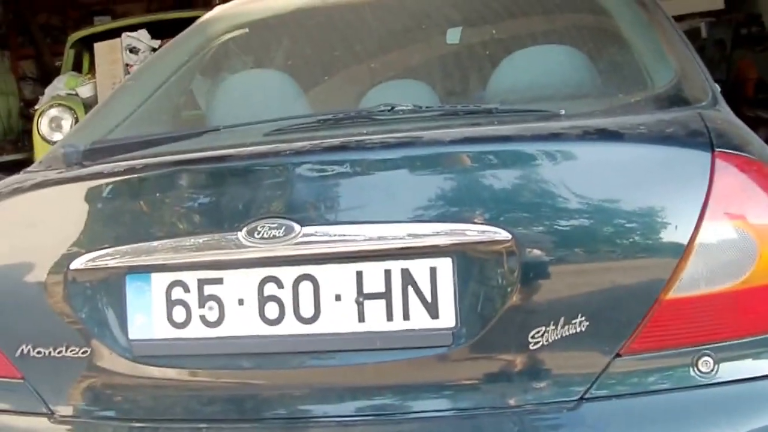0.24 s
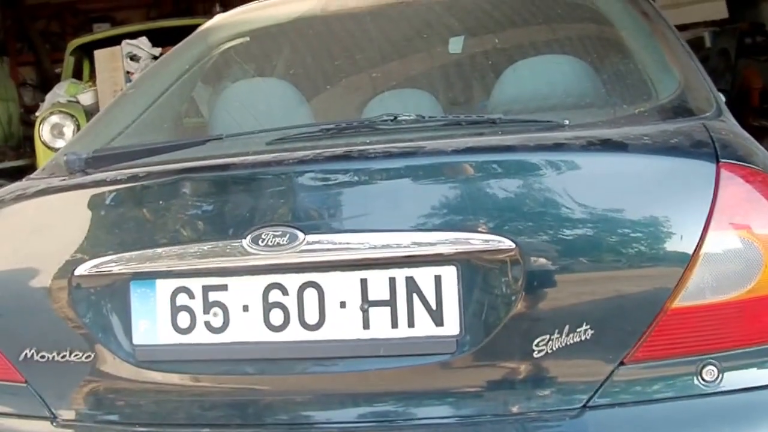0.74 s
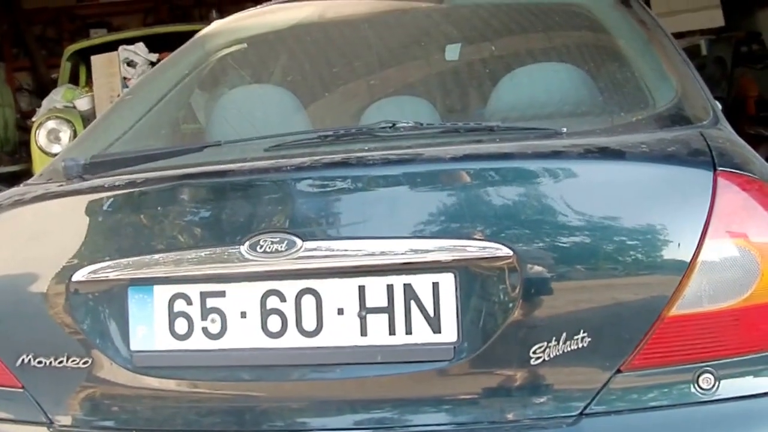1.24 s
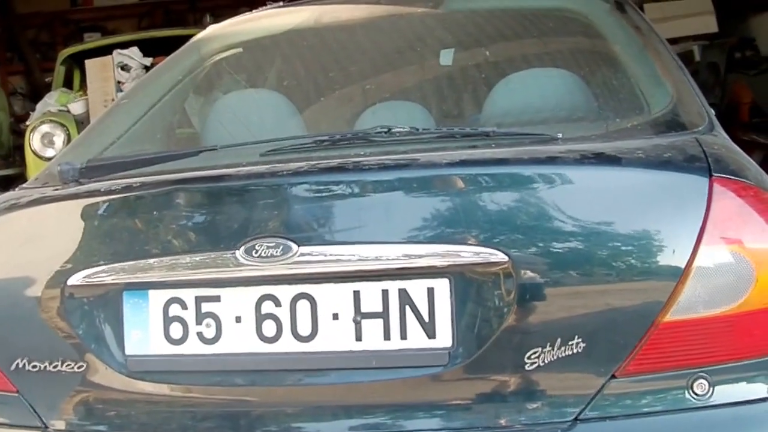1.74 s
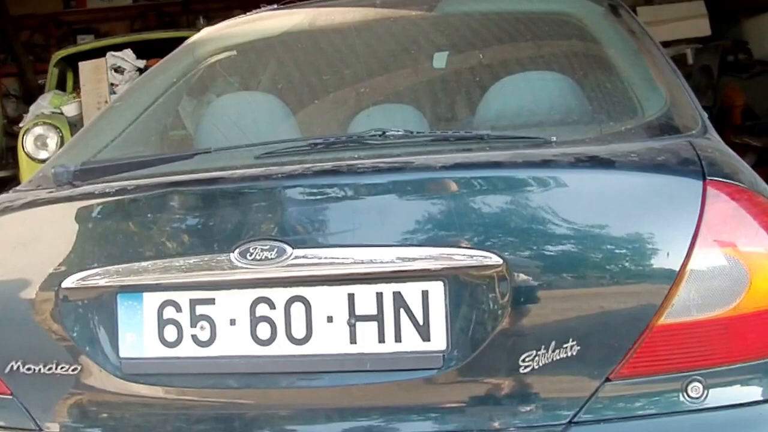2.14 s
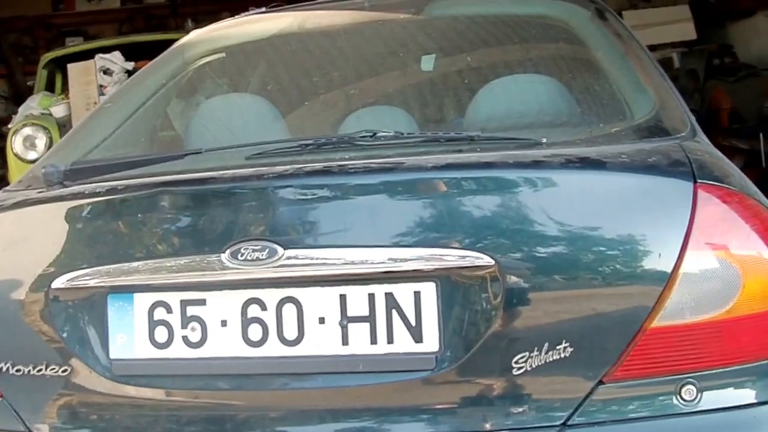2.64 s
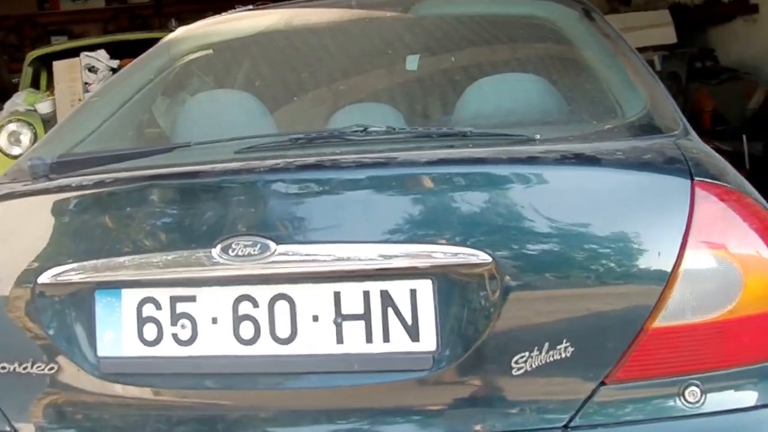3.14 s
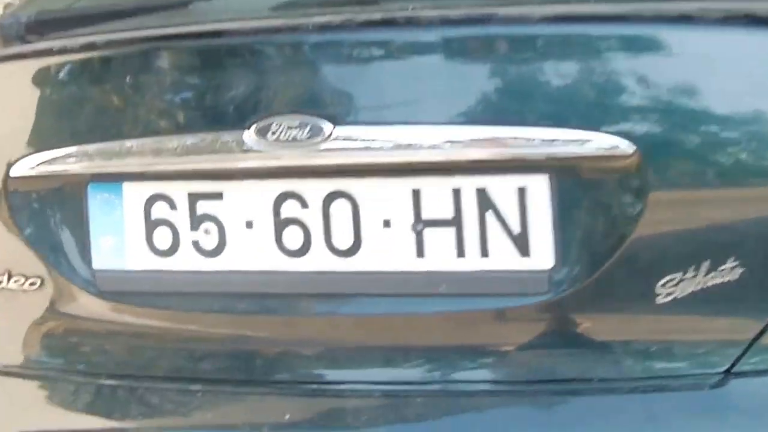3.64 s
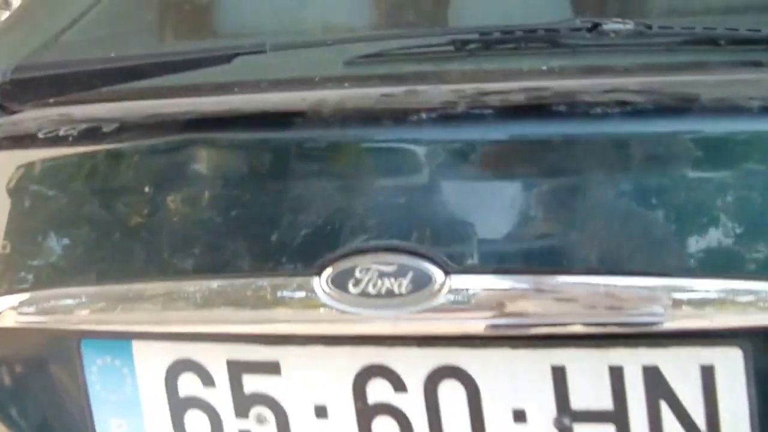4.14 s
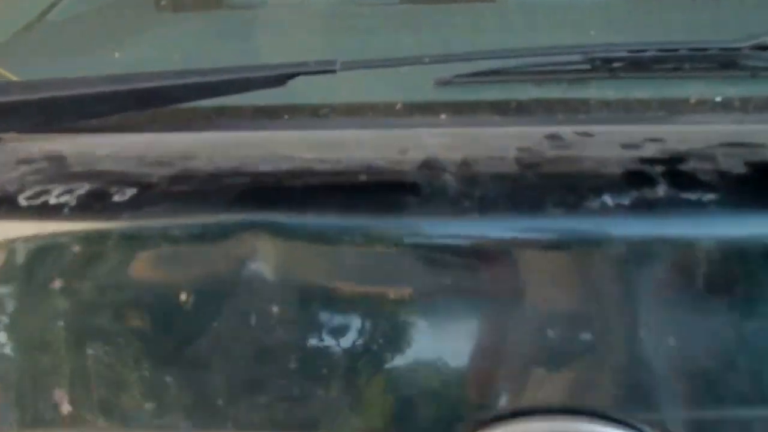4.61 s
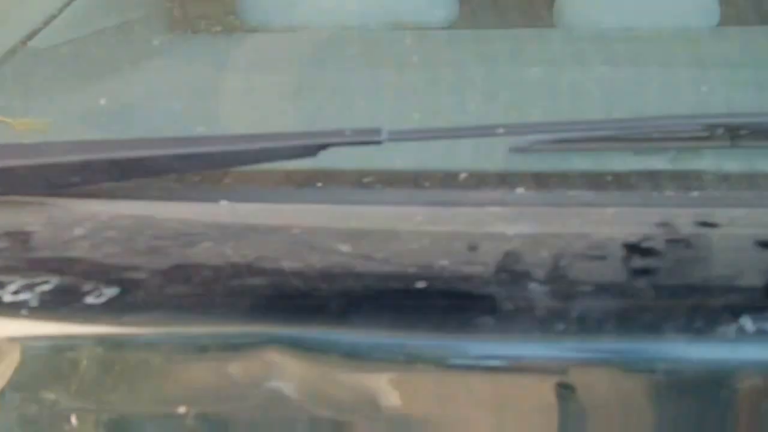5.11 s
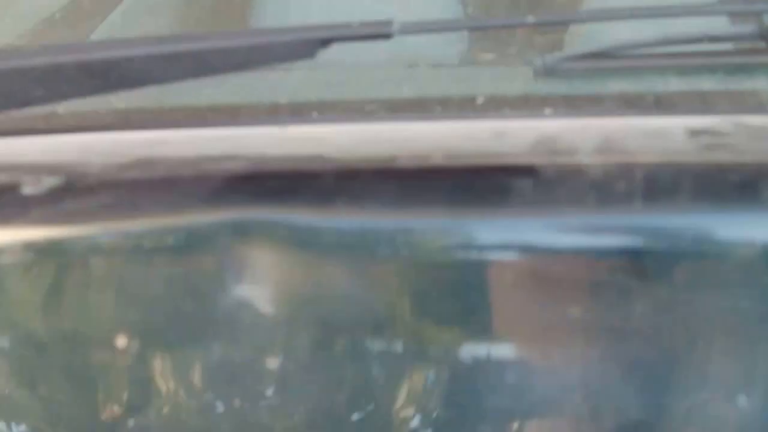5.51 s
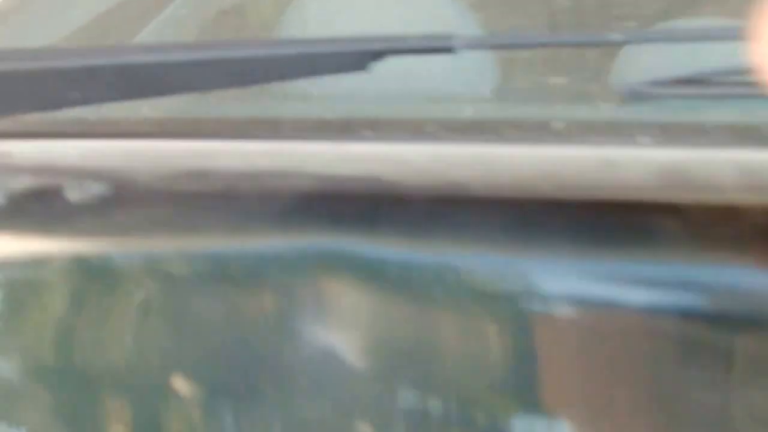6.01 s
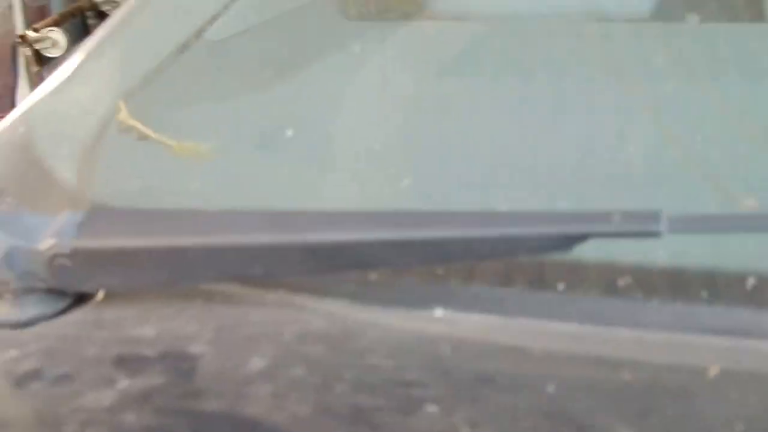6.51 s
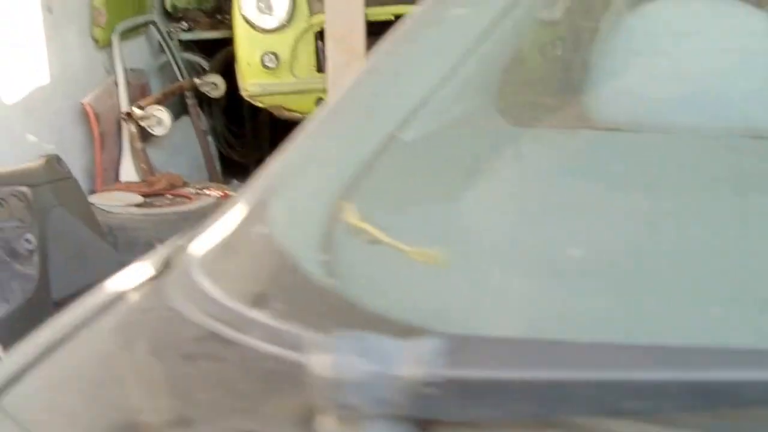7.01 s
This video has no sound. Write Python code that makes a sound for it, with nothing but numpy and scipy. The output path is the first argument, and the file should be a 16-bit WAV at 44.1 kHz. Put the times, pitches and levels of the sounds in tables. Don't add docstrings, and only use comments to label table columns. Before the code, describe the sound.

Quiet outdoor air, light hiss and a thin buzzing camera whine run throughout. A small plastic button clicks at 0.15 seconds, followed by soft, dull thuds around 0.5. A distant bird gives short, rough falling chirps at 1.2 and again at 2.0; the button clicks at 1.9. At 2.63 the door locks whirr briefly and clunk hard, ringing panels and rods for a fraction of a second. A faint click and dry scrape come near 3.15. From 3.5 to 5.3, grit ticks, cloth and hand rubs, shoe scuffs and dull knocks cluster unevenly, with pebbles clicking at 4.03 to 4.11. Another button click at 5.29 leads to a stuttering rubber creak from 5.36 to 5.53, then small knocks and ticks. At 6.34 the hatch latch releases in a loud, close metallic clatter lasting about 0.12 seconds, with a low hum lingering. Soft shuffles and muted knocks finish by 7.3.

```python
import sys
import numpy as np
from scipy import signal
from scipy.fft import rfft, irfft, next_fast_len
from scipy.io import wavfile
from scipy.ndimage import uniform_filter1d

SR = 44100
rng = np.random.default_rng(int(sys.argv[2]) if len(sys.argv) > 2 else 0)


def output_pcm(signal):
    pcm = np.clip(np.atleast_2d(signal).T, -1, 1) * 32767
    wavfile.write(sys.argv[1], SR, np.round(pcm).astype(np.int16))


def rack_gain(trim_db):
    fader = np.asarray(trim_db, float)
    return 10 ** (fader / 20)


N = 320033

# freq_hz, level_db, t60_s
DOOR_MODES = [(639, -14, 0.42), (856, -19, 0.32), (1003, -14, 0.47), (1088, -3, 0.16), (1150, -8, 0.32),
              (1181, 1, 0.26), (1272, -16, 0.27), (1319, -6, 0.24), (1440, 4.5, 0.17), (1550, -3, 0.15),
              (1760, -2, 0.19), (2140, -7, 0.1), (2270, -8, 0.19), (2300, -5, 0.11)]
# freq_hz, level_db, t60_s
ROD_MODES = [(3170, -2, 0.23), (3302, 0.5, 0.3), (3400, -8, .25), (4070, 0, 0.2), (4430, -8, 0.39),
             (4530, -9, 0.4), (5281, -9, 0.29), (5450, -11, 0.18), (6196, -19, 0.24), (6756, -17, 0.3),
             (7350, -9, 0.26), (7693, -15, 0.24), (9878, -23, 0.26), (10170, -23, 0.26)]


def level(x, db):
    return x * rack_gain(db) / np.sqrt(np.mean(x ** 2))


def colour(x, points):
    hz, db = np.transpose(points)
    size = next_fast_len(len(x))
    log_hz = np.log(np.maximum(np.arange(size // 2 + 1) * SR / size, 1))
    gain = rack_gain(np.interp(log_hz, np.log(hz), db))
    return irfft(rfft(x, size) * gain, size)[:len(x)]


def band(x, hz, width_hz):
    b, a = signal.iirpeak(min(hz, 0.45 * SR), hz / width_hz, fs=SR)
    return signal.lfilter(b, a, x)


def peaks(x, table):
    out = np.zeros(len(x))
    for k, (hz, width_hz, db) in enumerate(table):
        pole_width_hz = 2.11 * width_hz
        steep = band(band(x, hz, pole_width_hz), hz, pole_width_hz)
        out += (-1) ** k * rack_gain(db) * steep
    return out


def grit(rate_hz, scatter_db):
    hit = rng.random(N) < rate_hz / SR
    size = rack_gain(scatter_db * np.minimum(rng.exponential(size=N), 3))
    return level(hit * size * rng.standard_normal(N), 0)


def ring(hz, ms):
    t = np.arange(int(0.06 * SR)) / SR
    attack = 1 - np.exp(-t * hz * 2.02)
    return np.sin(2 * np.pi * hz * t) * np.exp(-t * 2300 / ms) * attack


def add(out, s, sound):
    i = int(s * SR)
    out[i:i + len(sound)] += sound[:N - i]


def clunk(blows, shake, modes, modes_db, linger):
    out, start_s = np.zeros(N), blows[0][0] - 0.05
    shake = level(shake, 0)[int(start_s * SR):][:SR]
    t = start_s + np.arange(len(shake)) / SR
    dull = signal.sosfiltfilt(signal.butter(2, 2700, fs=SR, output="sos"), shake)
    treble = shake - dull
    rattle = np.zeros(len(shake))
    for s, db, rise_ms, fall_ms, treble_db in blows:
        age_ms = 1000 * np.maximum(t - s, 0)
        decay_db = np.maximum(-60 * age_ms / fall_ms, -200)
        force = rack_gain(db) * (1 - np.exp(-age_ms / rise_ms)) * rack_gain(decay_db)
        rattle += force * (dull + rack_gain(treble_db) * treble)
    twins = 1 + 0.0086 * rng.standard_normal((len(modes), 4))
    panels = np.zeros(len(shake))
    for (hz, db, t60_s), row in zip(modes, twins):
        width_hz = 2.2 / (linger * min(t60_s, 0.5))
        for twin in row:
            panels += rack_gain(db) * np.sqrt(t60_s) * band(rattle, hz * twin, width_hz)
    match = np.sqrt(np.sum(rattle ** 2) / np.sum(panels ** 2))
    add(out, start_s, rattle + panels * rack_gain(modes_db) * match)
    return out


def lock_actuators():
    # start_s, rattle_db, rise_ms, fall_t60_ms, treble_db
    blows = [
        (2.628, -35, 1.2, 160, -28),
        (2.643, -21.5, 4.9, 100, -41),
        (2.6465, -17, 0.9, 44, 3),
        (2.660, -25.5, 2.9, 169, -9.5),
        (2.69, -37, 12, 466, -11.5),
    ]
    # freq_hz, width_hz, level_db
    rattle_bands = [(232, 150, -24), (604, 236, -9.5), (1144, 710, -2.5), (1427, 680, -2.5), (2260, 260, -10),
                    (2770, 300, -35), (9940, 1450, -20), (14300, 2600, -29),
                    (3250, 200, -5.5), (4280, 410, -6), (5420, 310, -5.5), (7050, 660, -7)]
    shake = peaks(grit(20000, 0.96), rattle_bands)
    return clunk(blows, shake, [*DOOR_MODES, *ROD_MODES], -9.5, 0.36)


def struck_doors():
    out, t = np.zeros(N), np.arange(SR // 2) / SR
    strike_s, twin_spread = 2.649, 0.0056
    for table, db in ((DOOR_MODES, -35), (ROD_MODES, -41)):
        chance = rng.standard_normal((len(table), 2))
        for (hz, mode_db, t60_s), (off, turn) in zip(table, chance):
            twin_hz = hz * (1 + twin_spread * off)
            pair = np.sin(2 * np.pi * hz * t) + 0.74 * np.sin(2 * np.pi * twin_hz * t + turn)
            envelope = rack_gain(db + mode_db - 60 * t / t60_s) * (1 - np.exp(-t / 0.0032))
            add(out, strike_s, envelope * pair)
    return out


def hatch_latch():
    # start_s, rattle_db, rise_ms, fall_t60_ms, treble_db
    blows = [(6.322, -49.5, 8, 280, -23), (6.340, -23.5, 4, 213, 4.5), (6.348, -21, 0.97, 81, 5.5),
             (6.361, -20.5, 1.1, 61, -16), (6.3765, -20, .6, 73, -4), (6.386, -27, .6, 27, 11),
             (6.390, -18, 0.75, 44, -5), (6.396, -31.5, 2, 460, -7.5), (6.419, -36, .6, 30, 7),
             (6.4285, -22, .5, 86, -6), (6.4415, -30, .5, 24, 6.5), (6.452, -27.5, 1.1, 83, 0),
             (6.462, -56, 20, 200, -12), (6.485, -56, 2, 74, 6), (6.508, -58, 2, 110, 11)]
    # freq_hz, level_db, t60_s
    modes = [(419.5, 11, 0.5), (702, 8.5, 0.16), (790, -6, 0.3), (880, 4, .4), (1100, 2, 0.073),
             (1350, -2, 0.2), (1500, 5, 0.06), (1700, -4, 0.2), (2420, 1, .15), (2600, 4, 0.08),
             (3700, 3, 0.05), (3880, -8, .15), (4600, -12, .1), (9200, -8, .02)]
    # freq_hz, level_db (per Hz)
    spectrum = [(35, -62), (110, -16), (262, -9.5), (437, -8), (785, 0.5), (1470, 1), (2000, -5.5),
                (2580, -4), (2900, -6.5), (7000, -20.5), (9300, -21.5), (11500, -28.5), (16000, -39)]
    return clunk(blows, colour(grit(11000, 2.0), spectrum), modes, -14, 0.61)


def boom():
    # start_s, level_db
    blows = [
        (2.65, -74),
        (3.721, -71),
        (4.982, -71),
        (5.401, -70),
        (6.359, -61.5),
    ]
    out, t = np.zeros(N), np.arange(2 * SR) / SR
    freq_hz, t60_s, rise_s = 219, 3.4, 0.051
    for s, db in blows:
        envelope = rack_gain(db - 60 * t / t60_s) * (1 - np.exp(-t / rise_s))
        add(out, s, envelope * np.sin(2 * np.pi * freq_hz * t))
    return out


def friction():
    # peak_s, swell_ms (per 20 dB), fade_ms (per 20 dB), body_db, grit_db (relative)
    scrapes = [(3.152, 2, 77, -69, 11), (4.318, 41, 20, -48, 0.5), (4.811, 1, 40, -61, 1),
               (4.822, 15, 25, -58.5, 5), (4.833, 26, 26, -49.5, -0.5), (5.15, 81, 51, -70, 13),
               (5.25, 1, 13, -55, 8), (5.27, 49, 120, -67, 4), (5.292, 29, 80, -63.5, 9.5)]
    rubs = [(3.718, 66, 66, -46.5, -6), (3.706, -6, 35, -44, 3), (3.812, -2, 37, -64, 2),
            (3.84, 2, 42, -52, -5), (3.854, 6, 69, -53, -10.5), (3.924, 0, 33, -47, -13),
            (4.1, 200, 30, -69.5, 6), (4.35, 64, 348, -71.5, 13), (4.533, 2.5, 13, -41.5, -7.5),
            (4.595, 70, 18, -58, -15), (4.862, 5, 20, -49, -10), (4.89, 28, 40, -70, 2),
            (4.982, 60, 148, -58, -10), (5.024, 42, 66, -54, -7), (5.36, 16, 27, -55, -15),
            (5.53, 20, 252, -58, -12), (6.04, 3, 58, -57, -2.5), (7.086, 1, 244, -55.5, -36)]
    shuffles = [(3.74, 41, 120, -57, -7), (5.19, 29, 69, -59, -19), (5.34, 47, 30, -61, -21),
                (5.676, 110, 60, -59, -27), (5.83, 28, 30, -61, 7), (6.09, 93, 37.04, -75, 10),
                (6.54, 27, 150, -61, -8), (6.65, 590, 292, -58.5, -18), (6.9, 18, 149, -67.5, -3),
                (6.98, 47, 400, -75, -22), (7.21, 230, 200, -72.5, -28)]
    # freq_hz, width_hz, level_db
    body_bands = [(1000, 295, 0), (1250, 370, 3), (1820, 1400, -15)]
    # freq_hz, width_hz, level_db
    grit_bands = [(2330, 1500, 30), (3300, 2400, -15), (4600, 600, -2)]
    t, out = np.arange(N) / SR, np.zeros(N)
    body = level(peaks(grit(5000, 1.5), body_bands), 0)
    grains = level(peaks(grit(4500, 1.5), grit_bands), 0)
    dust = level(peaks(grit(2500, 1.0), [(6740, 2800, 9.0), (11500, 5600, -11)]), 0)
    thud = level(peaks(grit(1500, 1.9), [(200, 103, -5.0), (353, 52, -6.0), (713, 285, 0.5)]), 0)
    for table, dust_db, thud_db in ((scrapes, -8, -30), (rubs, -23, -7.5), (shuffles, -27, 3.1)):
        for s, swell_ms, fade_ms, db, grit_db in table:
            on = slice(int((s - swell_ms / 500) * SR), int((s + fade_ms / 500) * SR))
            ms = 1000 * (t[on] - s)
            force = rack_gain(db + 20 * np.minimum(ms / swell_ms, -ms / fade_ms))
            mix = body[on] + rack_gain(grit_db) * grains[on] + rack_gain(thud_db) * thud[on]
            mix += rack_gain(dust_db + 0.73 * grit_db) * dust[on]
            out[on] += force * mix
    return out


def contacts(hits):
    out = np.zeros(N)
    fade = np.exp(-np.arange(300) / SR / 0.0007)
    for s, db, ring_hz, ring_ms, crack_hz, crack_db in hits:
        noise = rng.standard_normal(300)
        crack = ring(crack_hz, 1.6)[:300]
        splinters = fade * band(noise, 1.5 * crack_hz, 0.8 * crack_hz)
        add(out, s, rack_gain(db) * ring(ring_hz, ring_ms))
        add(out, s, rack_gain(db + crack_db + 5) * (crack + 0.5 * splinters))
    return out


def knocks():
    # start_s, peak_db, ring_hz, crack_db (relative)
    table = [(0.57, -48, 1020, -20), (3.676, -43, 1800, -14), (3.681, -45, 630, -4), (3.706, -45, 655, -18),
             (3.714, -32, 740, -14), (3.722, -34, 890, -16), (3.739, -40, 800, -14), (3.754, -37, 890, -16),
             (4.288, -43, 1700, -20), (4.346, -37, 2050, -20), (3.839, -41, 1150, -21),
             (3.853, -46, 1130, -15), (3.924, -36.5, 1010, -20), (4.315, -30.5, 1380, -21),
             (4.387, -39, 1390, -20), (4.53, -27, 1220, -25), (4.8576, -31.5, 1250, -16),
             (4.865, -35, 1100, -12), (4.873, -42, 1150, -18), (6.3493, -13, 1390, -11),
             (6.362, -15, 1500, -15), (6.377, -12, 1300, -9), (6.429, -16, 1450, -6),
             (6.441, -22, 1610, -5), (6.453, -18, 1300, -4), (5.04, -45, 1190, -9), (5.178, -41, 910, 0.5),
             (5.248, -39, 1570, -2.5), (5.315, -40, 1310, -15), (5.555, -34, 1150, -16),
             (5.59, -40.5, 856, -14), (5.64, -44, 1000, -26), (5.673, -40, 1100, -21),
             (5.687, -42, 1050, -16), (5.609, -42, 950, -20), (5.756, -46, 1120, -12), (6.04, -48, 875, -6),
             (7.007, -43, 830, -27), (7.087, -33.5, 870, -37), (7.182, -38, 860, -20)]
    ring_cycles, crack_hz = 5.2, 2480
    return contacts([(s, db, hz, 1000 * ring_cycles / hz, crack_hz, crack_db)
                     for s, db, hz, crack_db in table])


def ticks():
    # start_s, peak_db, crack_hz, crack_db (relative)
    table = [(3.515, -55, 4900, -2), (3.571, -50, 3200, 5.5), (3.190, -57, 3000, 6), (3.529, -61, 5000, 2),
             (3.608, -58, 4800, 2), (3.615, -57, 3300, 7), (5.608, -57, 3300, 0), (5.625, -58, 3530, 3),
             (3.598, -55, 4700, 7), (3.649, -46, 3100, 0), (4.265, -56, 3150, 10), (4.277, -56, 3400, 5),
             (4.374, -60, 3200, 6), (4.411, -53, 3330, 7), (4.4825, -50.5, 3120, 12.5),
             (5.039, -49.5, 2700, 7.5), (5.533, -47, 4900, -2), (5.757, -59.5, 4800, 6),
             (5.804, -57, 3600, 4), (5.821, -51, 3770, 4), (5.828, -42, 3400, 4), (5.343, -49.5, 3600, 5),
             (5.856, -53, 5200, 1), (5.940, -48.5, 2670, 1), (5.947, -56, 3940, 3), (5.956, -57, 4600, 1),
             (5.977, -56, 2600, 3), (6.003, -54, 2600, 1), (6.063, -46.5, 3330, 6), (6.092, -54, 3000, 6),
             (6.878, -49.5, 3630, 7.5), (6.879, -60, 5400, 9)]
    ring_hz, ring_ms = 1230, 2.7
    return contacts([(s, db, ring_hz, ring_ms, hz, crack_db) for s, db, hz, crack_db in table])


def pebbles():
    # start_s, peak_db
    table = [(4.0305, -39.5), (4.0618, -35.5), (4.076, -43), (4.0878, -37), (4.1067, -33.5), (4.1124, -44)]
    out = np.zeros(N)
    for s, db in table:
        add(out, s, rack_gain(db) * ring(3240, 1.03))
        add(out, s + 0.0035, rack_gain(db - 5) * ring(3300, 1.6))
    return out


def thuds():
    # start_s, peak_db, freq_hz, ring_ms
    table = [(0.432, -49, 124, 6.3), (0.469, -43.5, 180, 4.5), (0.477, -27.5, 348, 2.8),
             (0.504, -52, 226, 6.4), (0.521, -38.5, 159, 4.9), (2.648, -27, 539, 17.5),
             (2.664, -42.5, 257, 25), (4.972, -49.5, 153, 17), (5.004, -51, 229, 6.6),
             (5.175, -55, 387, 22), (5.316, -55, 402, 23), (5.807, -56.5, 345, 13), (6.043, -57, 370, 24)]
    out = np.zeros(N)
    for s, db, hz, ms in table:
        add(out, s, rack_gain(db + 6.5) * ring(hz, ms))
    return out


def button():
    # start_s, peak_db, treble_db (relative)
    clicks = [(0.1553, -35, -11), (1.8932, -29, -11), (3.1465, -38, -15), (5.2865, -36, -6)]
    # freq_hz, level_db, ring_ms
    case_modes = [(1380, -7, 4.6), (2300, 6, 0.89)]
    # freq_hz, level_db, ring_ms
    dome_modes = [(5070, 6.5, 1.4), (8360, 9.5, 0.61)]
    out = np.zeros(N)
    case = sum(rack_gain(db) * ring(hz, ms) for hz, db, ms in case_modes)
    dome = sum(rack_gain(db) * ring(hz, ms) for hz, db, ms in dome_modes)
    for s, db, treble_db in clicks:
        add(out, s, rack_gain(db) * (case + rack_gain(treble_db) * dome))
    return out


def creak():
    # start_s, peak_db
    slips = [(5.36, -36.5), (5.371, -35.5), (5.386, -32.5), (5.393, -37.5), (5.4, -30.5), (5.416, -30.5),
             (5.42, -46), (5.436, -31), (5.452, -30.5), (5.463, -34), (5.474, -36.5), (5.481, -34),
             (5.49, -37), (5.499, -36.5), (5.509, -39), (5.518, -37.5), (5.528, -60)]
    mutter_bands = [(322, 170, -3.5), (730, 190, 5.0), (1130, 380, 6.5), (2570, 2100, -13.0)]
    out = np.zeros(N)
    snap = 0.8 * ring(6900, 0.8) + 0.3 * ring(9500, 0.5) + ring(3100, 1.5) + 0.7 * ring(5000, 1.0)
    fade = np.exp(-np.arange(1500) / SR / 0.009)
    for s, db in slips:
        bend, crisp = rng.standard_normal(2)
        answer = ring(1100 * (1 + 0.08 * bend), 4.0) + 0.4 * ring(750, 6.0)
        mutter = fade * peaks(rng.standard_normal(1500), mutter_bands)
        add(out, s - 0.0008, rack_gain(db - 7 + 2 * crisp) * snap)
        add(out, s + 0.0004, rack_gain(db + 3) * answer)
        add(out, s + 0.001, rack_gain(db - 2) * mutter)
    return out


def bird():
    # start_s, length_s, start_hz, end_hz, level_db
    chirps = [
        (1.237, 0.055, 4130, 3610, -59.5),
        (1.276, 0.046, 3040, 2850, -64),
        (1.36, 0.023, 2960, 3170, -70),
        (2.017, 0.061, 4150, 3590, -59.5),
        (2.058, 0.058, 3200, 2840, -66),
    ]
    out = np.zeros(N)
    for s, length_s, start_hz, end_hz, db in chirps:
        t = np.arange(int(length_s * SR)) / SR
        depth = 1.9 if start_hz > 3500 else 1.9 * 0.4
        trill = depth * np.sin(2 * np.pi * 190 * t)
        phase = 2 * np.pi * np.cumsum(np.linspace(start_hz, end_hz, len(t))) / SR
        patches = np.repeat(rng.random(len(t) // 200 + 1), 200)[:len(t)]
        gusts = 0.37 + 0.6 * uniform_filter1d(patches, size=90)
        add(out, s, rack_gain(db + 6) * np.hanning(len(t)) * gusts * np.sin(phase + trill))
    tail = rng.standard_normal(6000) * np.exp(-np.arange(6000) / SR / 0.038)
    tail /= np.sqrt(np.sum(tail ** 2))
    return out + rack_gain(2.0) * signal.fftconvolve(out, tail)[:N]


def yard_echo(near):
    yard = band(rng.standard_normal(SR // 2), 710, 2300) * np.exp(-np.arange(SR // 2) / SR / 0.048)
    return rack_gain(-23.5) * signal.fftconvolve(near, yard / np.sqrt(np.sum(yard ** 2)))[:N]


def quiet_air():
    # freq_hz, level_db (per Hz)
    spectrum = [(59, -36), (100, -13), (502, -8.5), (547, -6.5), (1130, 0.5), (1580, -6), (1800, -5),
                (2130, -9.5), (3860, -15), (4570, -19), (4980, -22.5), (6020, -26.5), (16000, -39)]
    swell_db = 0.7 * 77 * uniform_filter1d(rng.standard_normal(N), size=6000)
    return level(colour(rng.standard_normal(N), spectrum), -64) * rack_gain(swell_db)


def camera():
    # freq_hz, level_db (while on)
    whine = [(1818, -64.5), (3940, -79.5), (4907, -74.5), (7800, -88), (1020, -99)]
    frame_hz = 30000 / 1001
    frame = (np.arange(N) / SR * frame_hz + 0.00975) % 1
    on = uniform_filter1d(1.0 * (frame < 0.68), size=60)
    tones = sum(rack_gain(db) * np.sin(2 * np.pi * hz * frame / frame_hz) for hz, db in whine)
    half_s = ((frame - 0.385) % 0.5) / frame_hz
    tick = rack_gain(-63) * np.exp(-half_s / 0.0008) * np.sin(2 * np.pi * 15720 * half_s)
    return on * tones + tick


def channel_hiss():
    # freq_hz, level_db (per Hz)
    spectrum = [(2.9, -43), (5.0, 11.5), (16, 2), (33, -5), (80, -12.5), (390, -27), (647, -30.5),
                (1150, -33), (2500, -26.5), (16000, -28)]
    return level(colour(rng.standard_normal(N), spectrum), -63)


def scene():
    near = lock_actuators() + struck_doors() + hatch_latch()
    near += friction() + knocks() + ticks() + pebbles() + thuds() + button() + creak()
    mono = near + yard_echo(near) + boom() + bird() + quiet_air() + camera()
    return np.tile(mono, (2, 1))


def roll_off(x):
    return signal.sosfilt(signal.butter(12, 16640, fs=SR, output="sos"), x)


def record(dry):
    # start_s, depth_db, recovery_ms
    ducks = [
        (6.366, -20, 3.3),
        (6.388, -14, 0.74),
        (6.3933, -20, 2.7),
    ]
    t, gain_db = np.arange(N) / SR, np.zeros(N)
    for s, db, ms in ducks:
        age_ms = 1000 * np.maximum(t - s, 0)
        gain_db += (t > s) * db * np.exp(-(age_ms / ms) ** 2)
    rounded = 0.42 * np.tanh(dry / 0.42)
    bass_cut = signal.butter(2, 140, "high", fs=SR, output="sos")
    heard = signal.sosfilt(bass_cut, rounded * rack_gain(gain_db))
    hiss = np.array([channel_hiss() for _ in range(2)])
    treble_limit = signal.ellip(10, 0.2, 70, 15790, fs=SR, output="sos")
    return roll_off(signal.sosfilt(treble_limit, heard + hiss))


dry = scene()
out = record(dry)
output_pcm(out)
```